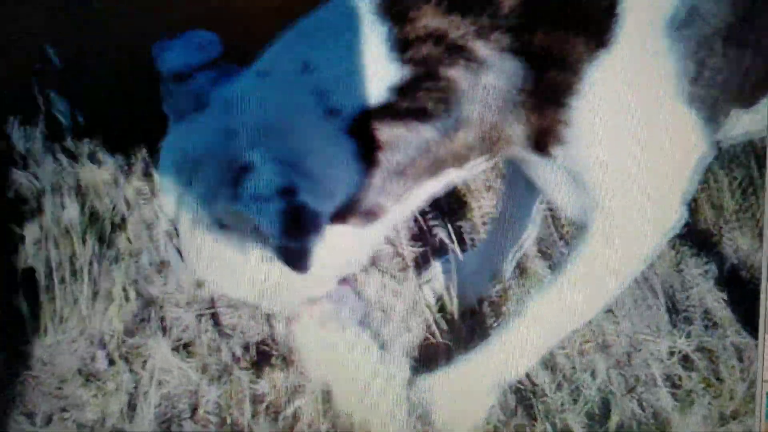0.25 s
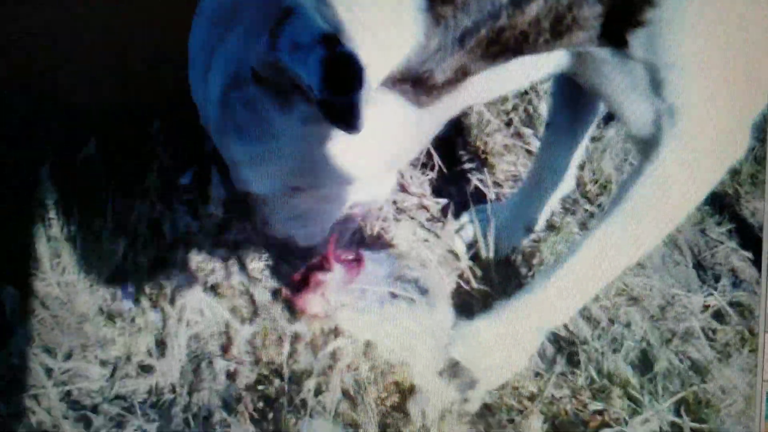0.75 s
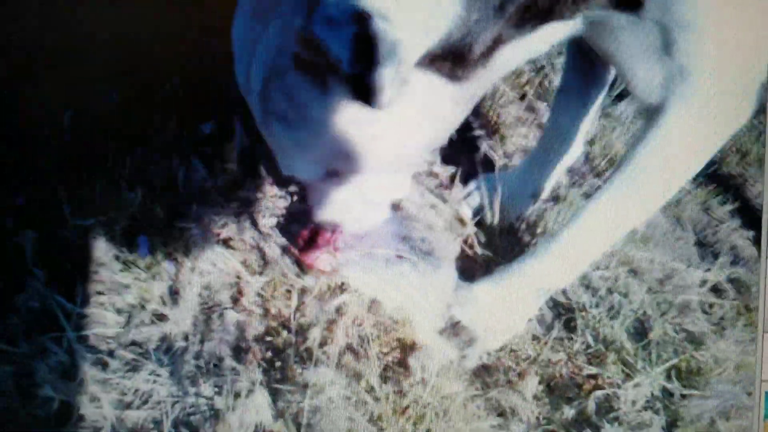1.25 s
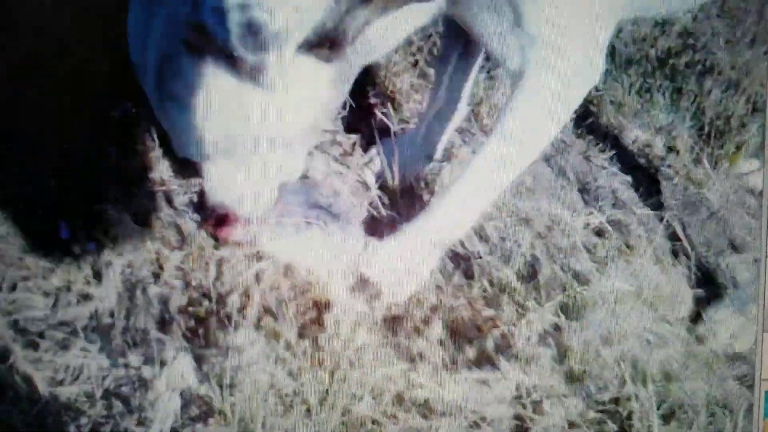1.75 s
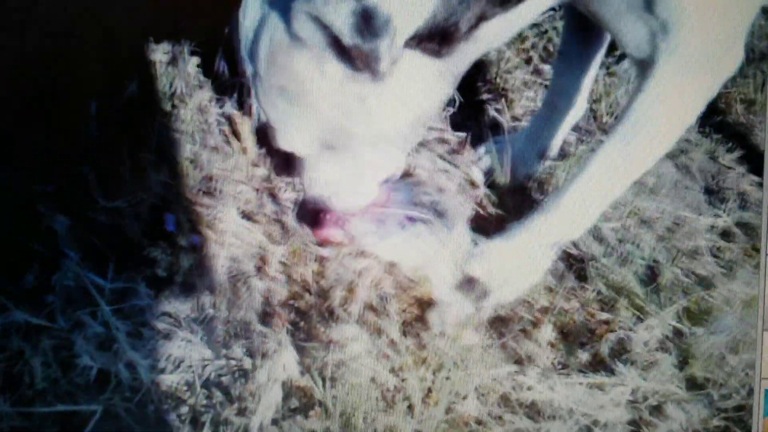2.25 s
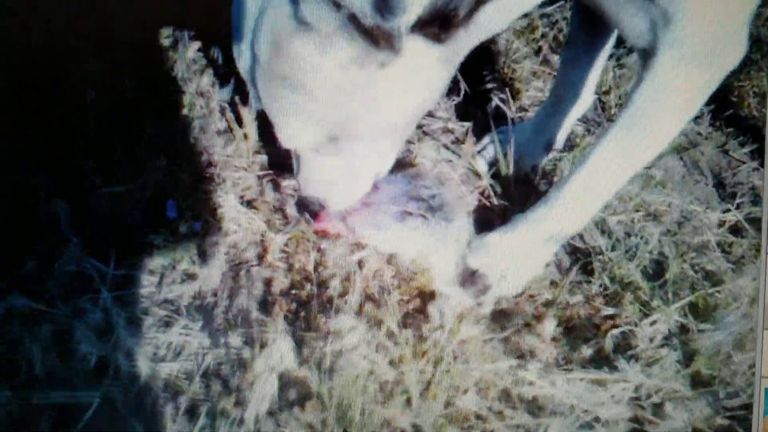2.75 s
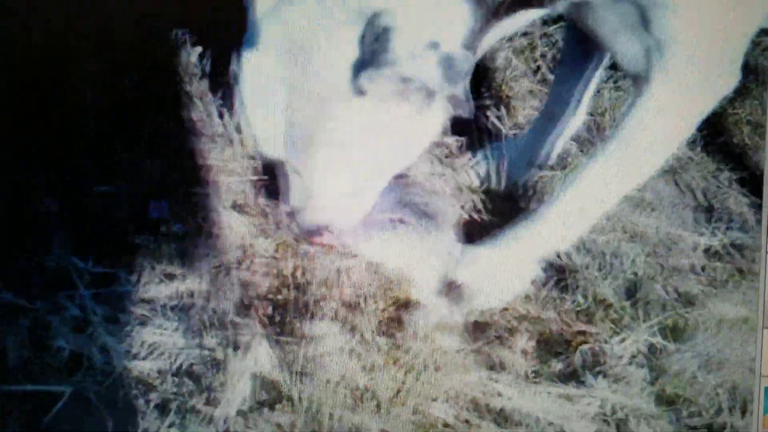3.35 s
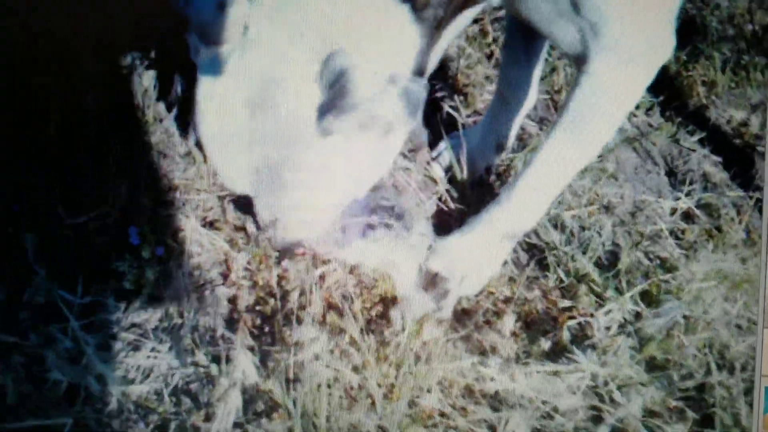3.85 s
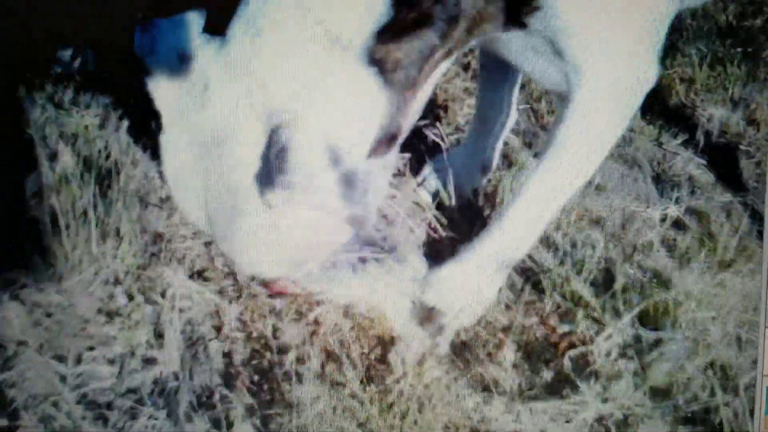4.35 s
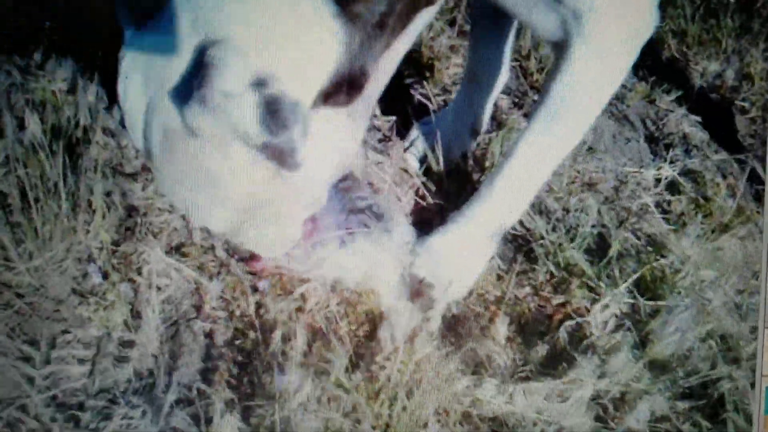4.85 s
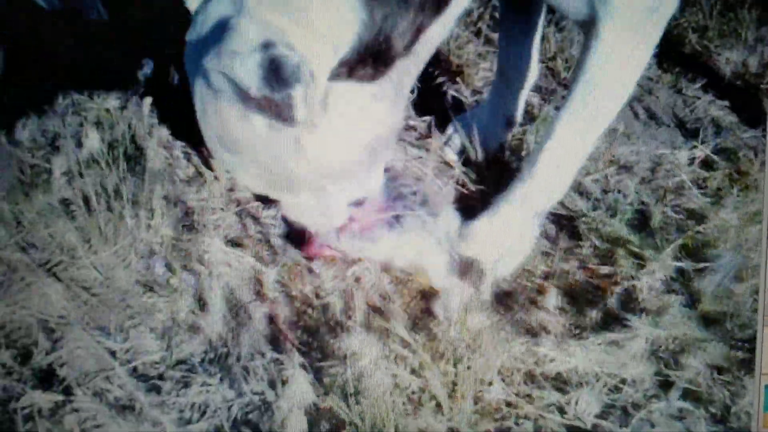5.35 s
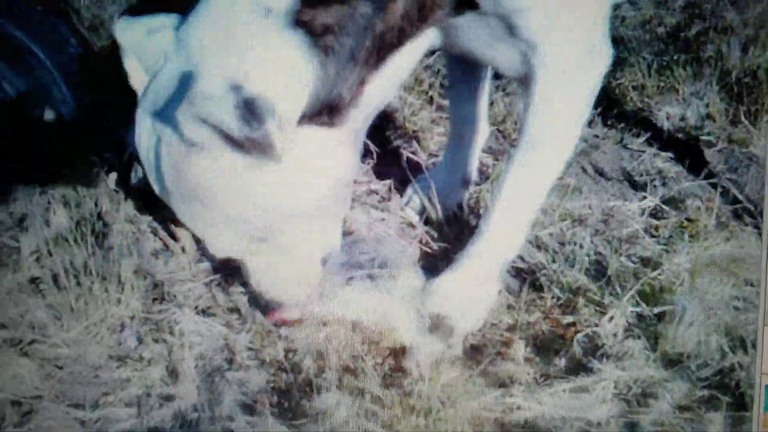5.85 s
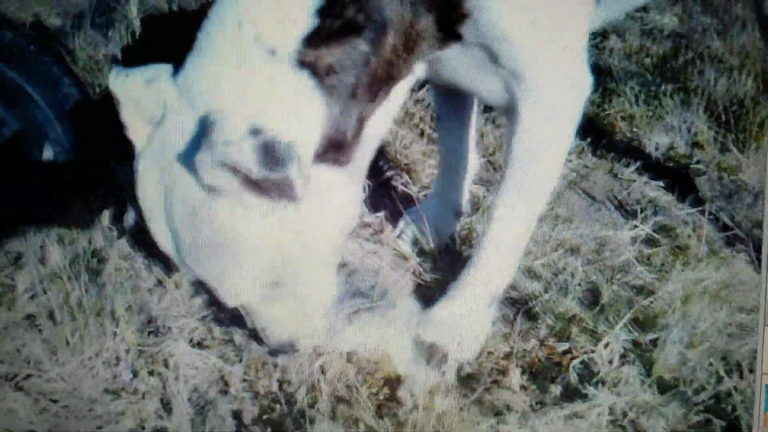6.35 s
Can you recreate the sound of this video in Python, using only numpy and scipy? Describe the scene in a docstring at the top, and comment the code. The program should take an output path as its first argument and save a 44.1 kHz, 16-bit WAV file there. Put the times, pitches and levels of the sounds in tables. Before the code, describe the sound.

Irregular sharp snaps and wet tearing from a feeding dog build to a dense crunching cluster before two seconds, with a rough snort. Then it calms to quiet snuffling, dry stalks rustling, isolated clicks and hollow jaw taps, one stronger knock near the end. A weak far bird twitters. Close stereo pickup of a small speaker, with little bass, a short room tail and faint hiss.

```python
"""Dog chewing at a carcass on dry grass

Filtered grainy noise gives the snuffling, tearing, ripping and rustling; damped tones give the jaw knocks,
ringing tones with noise bursts the snaps of bone and sinew, and gliding tones a far bird.
All of it plays from a small loudspeaker in a quiet room and reaches two microphone ports a hand apart,
where low room rumble and steady hiss lie underneath."""
import sys
import numpy as np
from scipy import signal
from scipy.fft import rfft, irfft, next_fast_len
from scipy.io import wavfile
from scipy.ndimage import uniform_filter1d, map_coordinates

SR = 44100
rng = np.random.default_rng(int(sys.argv[2]) if len(sys.argv) > 2 else 0)


def master(y):
    """Save y as 16-bit WAV."""
    cut = np.clip(np.atleast_2d(y).T, -1, 1)
    pcm = np.round(cut * 32767)  # scale
    wavfile.write(sys.argv[1], SR, pcm.astype(np.int16))


N = 290465


def gain_of(db):
    """Level to amplitude: 20 dB is a factor of ten."""
    return 10 ** (np.asarray(db) / 20)


def evened(x):
    """Normalisation by mean power: scales to rms 1."""
    return x / np.sqrt(np.mean(x ** 2) + 1e-20)


def read(points, hz):
    """Interpolation on a logarithmic frequency axis."""
    f, value = np.transpose(points)
    return np.interp(np.log(hz + 1), np.log(f + 1), value)


def add(mix, s, sound):
    """Superposition: adds a sound to the mix from second s."""
    part = mix[max(round(s * SR), 0):][:len(sound)]
    part += sound[:len(part)]


def coloured(x, spectrum):
    """Linear filtering: weights the spectrum of x by a table of levels, then scales to rms 1."""
    hz = np.fft.rfftfreq(len(x), 1 / SR)
    shaped = rfft(x) * gain_of(read(spectrum, hz))
    return evened(irfft(shaped, len(x)))


def grains(per_s, spread_db, wash):
    """Shot noise: random bursts of uneven size over a share of plain noise."""
    size_db = spread_db * np.minimum(rng.exponential(1, N), 4)
    clicks = gain_of(size_db) * (rng.random(N) < per_s / SR)
    bursts = evened(uniform_filter1d(clicks, size=40))
    return rng.standard_normal(N) * (wash + bursts)


def chewing():
    """Turbulence and fracture noise: nasal air, parting flesh and rubbed grass as coloured grainy noises."""
    # steady working of the muzzle: t/s, wet tearing level/dB, grass rustle level/dB
    steady = [(0, -56.5, -62), (.5, -59.5, -57.5), (.9, -58.5, -57.5), (1.3, -58, -53.5), (1.5, -55.5, -55),
              (1.98, -63, -60.5), (2.35, -59, -59), (2.7, -67, -61), (2.96, -66.5, -62), (3.3, -64.5, -59),
              (3.6, -66, -59), (4.0, -64, -57.5), (4.3, -60.5, -55), (4.8, -64, -55), (5.35, -63.5, -59),
              (5.65, -65.5, -61), (6.0, -65, -62), (6.59, -63, -58.5)]
    # relative spectral density of each noise: f/Hz, level/dB
    nose_spectrum = [(200, -8.5), (350, 1), (600, 7), (900, -2), (1500, -11.5), (4000, -77)]
    flesh_spectrum = [(500, -3.5), (900, -4), (2000, 3.5), (3500, -7.5), (5000, -11), (10000, -5)]
    fibre_spectrum = [(500, -7), (1000, 3), (2000, 1), (3300, -5), (4600, -3.5), (10000, -10.5)]
    grass_spectrum = [(1500, -41), (3500, 2.5), (5500, 0), (9000, 0), (14000, 4.5)]
    nose_under_db = -12.5  # steady snuffle relative to the tearing

    s, *levels_db = np.transpose(steady)
    t = np.arange(N) / SR
    tearing, rustle = (gain_of(np.interp(t, s, db)) for db in levels_db)
    snort, ripping, swish = tugs()
    snuffle = np.hypot(gain_of(nose_under_db) * tearing, snort)  # powers add

    nose = coloured(grains(300, 3.2, wash=1.8), nose_spectrum)
    flesh = coloured(grains(400, 3.4, wash=2.6), flesh_spectrum)
    fibres = coloured(grains(350, 4, wash=1.4), fibre_spectrum)  # coarser: single fibres give way
    stalks = coloured(grains(300, 4, wash=1.6), grass_spectrum)
    grass = coloured(grains(500, 3.6, wash=3.8), grass_spectrum)

    # slow level wander, 1.3 dB rms: one for the flesh, one for the grass
    wander = [evened(uniform_filter1d(v, size=2500)) for v in rng.standard_normal((2, N))]
    uneven_flesh, uneven_grass = gain_of(1.3 * np.array(wander))
    torn = (tearing * flesh + ripping * fibres) * uneven_flesh
    rubbed = (rustle * grass + swish * stalks) * uneven_grass
    return snuffle * nose + torn + rubbed


def tugs():
    """Amplitude envelopes: each tug or snort is a hump that rises a little faster than it falls."""
    # tugs and snorts: t/s, length/s, snuffle level/dB, ripping level/dB, rustle level/dB
    pulls = [(0, 0.055, -55.5, -50.5, -68), (0.57, 0.095, -87, -81, -57.5), (0.973, 0.046, -80, -56, -47),
             (1.548, 0.024, -33, -38, -56), (1.553, 0.094, -42, -46.5, -64),
             (1.617, 0.088, -62, -51.5, -65), (1.69, 0.088, -43, -44.5, -51), (1.723, 0.055, -42, -46, -52),
             (1.752, 0.12, -47, -51.5, -73), (2.002, 0.25, -64, -61.5, -52.5), (2.173, 0.22, -61, -64, -64),
             (2.433, 0.19, -91, -59.5, -56.5), (2.557, 0.24, -83, -63.5, -53.5),
             (3.021, 0.17, -46.5, -51, -61), (3.637, 0.35, -87, -58, -57.5), (4.116, 0.2, -65.5, -63, -74),
             (4.344, 0.3, -59.5, -49.5, -49), (4.664, 0.067, -88, -56, -51), (4.847, 0.25, -68.5, -63, -81),
             (5.654, 0.15, -66, -86, -65.5), (5.737, 0.24, -74, -64.5, -57), (6.202, 0.1, -61, -86, -79)]
    peak_at, sharpness = 0.35, 1.2  # share of the length spent rising; exponent of the sine hump
    out = np.zeros((3, N))
    for s, length, *levels_db in pulls:
        u = np.linspace(0, 1, round(length * SR))
        hump = np.sin(np.pi * np.interp(u, [0, peak_at, 1], [0, .5, 1])) ** sharpness
        for row, db in zip(out, levels_db):
            add(row, s, gain_of(db) * hump)
    return out


def snaps():
    """Impulsive fracture: a short damped ring roughened by noise, with a wide bright crack."""
    # snaps of bone, sinew and spit: t/s, ring level/dB, ring f/Hz, crack level/dB relative to the ring
    breaks = [(0.202, -39, 1090, -27), (0.292, -40, 1620, -6), (0.3334, -27, 1970, -9.5),
              (0.423, -42, 1570, -16), (0.4669, -45, 1270, -4), (0.564, -42, 1750, -22),
              (0.5802, -39, 1730, 0), (0.604, -33.5, 2130, -3.5), (0.6994, -45.5, 1610, 3),
              (0.7546, -42.5, 1710, 1), (0.767, -45, 1720, 5), (0.812, -40.5, 1320, -26),
              (0.836, -37.5, 960, -22), (0.9552, -31.5, 1980, -6), (1.0018, -46.5, 1140, 15.5),
              (1.0911, -46.5, 1840, 10), (1.2007, -26.5, 1670, -37), (1.212, -42, 1500, 7),
              (1.3841, -39, 1700, -6), (1.4422, -40, 2180, 3), (1.479, -40.5, 2000, -23),
              (1.507, -28, 1770, -12), (1.5225, -53, 2010, 9), (1.5313, -19, 1195, -5.5),
              (1.5348, -17.5, 970, 0.5), (1.542, -25, 2530, 11.5), (1.5553, -19, 1495, 5),
              (1.5926, -26.5, 2280, -3), (1.5974, -28.5, 2600, -5), (1.629, -25, 935, -23),
              (1.6546, -38.5, 2950, -35), (1.66, -39, 3380, -14), (1.664, -34.5, 1900, -22),
              (1.688, -40, 6300, 11), (1.7012, -35.5, 1670, -8), (1.709, -46, 2540, 12),
              (1.7154, -29, 1780, -12), (1.719, -33, 1700, -10), (1.727, -33.5, 1700, 7.5),
              (1.74, -35, 1510, -1), (1.7522, -18, 2430, -1.5), (1.7562, -21, 1900, -5.5),
              (1.7599, -20, 487, -30), (1.786, -35, 2550, -6), (1.8457, -39.5, 1690, -9),
              (1.934, -48.5, 1480, -25), (2.198, -46, 1560, -18), (2.748, -46, 2860, -11),
              (2.766, -37, 2900, -37), (4.917, -44.5, 1070, -17), (5.149, -27, 1600, -32),
              (5.6562, -35, 910, -27), (5.861, -42, 1110, 3.5), (6.2431, -43.5, 3130, -15),
              (6.246, -34.5, 5850, -1), (6.317, -45, 2930, -4)]
    # relative spectral density of the crack: f/Hz, level/dB
    crack_spectrum = [(1500, -13.5), (4000, -13), (8000, -8.5), (14000, -16)]
    crack_rise_s, crack_t60_s = .0005, .009
    out, t = np.zeros(N), np.arange(SR // 20) / SR
    onset = np.sin(np.pi / 2 * np.minimum(t / .0007, 1)) ** 2
    noises = rng.standard_normal((len(breaks), 2, len(t)))
    for (s, db, hz, crack_db), (ring_noise, crack_noise) in zip(breaks, noises):
        resonance = [(hz / 3, -22), (hz, 0), (hz * 1.24, -7), (hz * 4, -34), (SR / 2, -60)]
        rough = coloured(ring_noise, resonance)
        ring_t60_s = .009 + 5.5 / hz  # higher rings die sooner
        ring = (np.sin(2 * np.pi * hz * t) + 0.52 * rough) * gain_of(-60 * t / ring_t60_s)
        crack = gain_of(crack_db - 60 * t / crack_t60_s) * coloured(crack_noise, crack_spectrum)
        crack *= np.minimum(t / crack_rise_s, 1)
        add(out, s - .0005, gain_of(db) * onset * (ring + crack))
    return out


def knocks():
    """Damped modes: a dull blow in the jaw sounds two close tones that die away together."""
    # jaw and bone knocks: t/s, level/dB, f/Hz of the lower tone at the onset
    blows = [(0.003, -40.5, 371), (0.083, -46.5, 351), (0.201, -47, 350), (0.293, -40, 346),
             (0.35, -44.5, 353), (0.423, -43, 368), (0.585, -46, 356), (0.7, -46.5, 343),
             (0.838, -39.5, 383), (0.864, -44.5, 363), (0.998, -48.5, 345), (1.201, -41, 363),
             (1.385, -39.5, 340), (1.534, -30.5, 376), (1.556, -22.5, 357), (1.594, -28.5, 500),
             (1.603, -37, 406), (1.631, -31, 393), (1.675, -38, 375), (1.712, -35.5, 390),
             (1.903, -42.5, 418), (2.2, -46, 517), (2.273, -40, 451), (2.662, -42, 462),
             (3.785, -48.5, 590), (4.2, -46, 580), (4.536, -41.5, 550), (4.919, -43, 377),
             (5.422, -44, 534), (5.659, -29.5, 403), (5.703, -39.5, 336), (5.722, -41, 343),
             (6.016, -54, 310), (6.204, -36.5, 496)]
    sag_per_s = 1.33  # phase bend of the lower tone: its pitch sinks by twice this share per second
    out, t = np.zeros(N), np.arange(SR // 5) / SR
    rise = 1 - np.exp(-t / 0.00014)
    for (s, db, hz), (a, b) in zip(blows, rng.random((len(blows), 2))):
        lower = np.sin(2 * np.pi * hz * (t - sag_per_s * t ** 2))
        upper = np.sin(2 * np.pi * (hz * (1.194 + 0.2 * a) * t + b))
        decay = gain_of(db - 60 * t * hz / 24)  # falls 60 dB in 24 cycles
        add(out, s - .002, decay * rise * (lower + 0.4 * upper))
    return out


def bird():
    """Frequency modulation: thin gliding whistles, broken up by moving air and smeared by echoes."""
    # bird notes, each one glide: t/s, length/s, start f/Hz, end f/Hz, level/dB before the overall trim
    notes = [(.882, .04, 4600, 5200, -57), (1.24, .027, 4350, 4800, -52), (1.258, .011, 4250, 3600, -50),
             (1.267, .009, 3600, 4300, -53), (1.278, .011, 4300, 2950, -51), (1.288, .017, 2900, 3400, -57),
             (1.3, .022, 3350, 3350, -53), (2.23, .026, 3700, 3100, -65), (2.256, .03, 3150, 3450, -65),
             (2.55, .038, 3300, 3750, -63), (2.588, .04, 3700, 3150, -63), (3.25, .035, 3150, 3200, -64),
             (3.325, .04, 3200, 3550, -68), (3.608, .04, 3050, 4000, -69), (4.14, .025, 4050, 4650, -63),
             (4.16, .018, 4100, 3750, -63), (4.176, .014, 4600, 4300, -60), (4.19, .026, 3050, 3350, -66),
             (4.228, .024, 3600, 4150, -65), (4.268, .016, 3050, 3500, -65), (5.357, .024, 3800, 3900, -66),
             (5.4, .035, 3200, 4600, -64), (5.43, .028, 3700, 4100, -62), (5.46, .032, 3000, 3600, -65),
             (5.485, .025, 3100, 3750, -66), (5.503, .03, 3800, 4600, -62), (5.53, .028, 2900, 3500, -68),
             (5.554, .03, 3400, 2950, -67), (5.62, .04, 4100, 3700, -66), (5.66, .045, 3350, 3050, -68),
             (5.702, .033, 2650, 2300, -64), (6.268, .024, 4650, 4600, -64), (6.29, .016, 4600, 3700, -59),
             (6.325, .02, 2950, 3650, -68), (6.35, .022, 3600, 2950, -69)]
    trim_db, echo_gain, echo_t60_s = -3.5, .9, .13
    whistles = np.zeros(N)
    tremble_hz = uniform_filter1d(1500 * rng.standard_normal(N), size=120)  # varies below about 200 Hz
    for s, length, from_hz, to_hz, db in notes:
        count = round(length * SR)
        pitch = np.linspace(from_hz, to_hz, count) + tremble_hz[round(s * SR):][:count]
        tone = np.sin(2 * np.pi * np.cumsum(pitch) / SR)
        add(whistles, s, np.sqrt(2) * gain_of(db) * signal.windows.tukey(count, .4) * tone)
    flutter = uniform_filter1d(rng.standard_normal(N), size=90)
    flutter = evened(uniform_filter1d(flutter, size=90))
    direct = gain_of(trim_db) * whistles * gain_of(4 * flutter)  # flutter of 4 dB rms
    t = np.arange(SR // 4) / SR
    echoes = rng.standard_normal(len(t)) * gain_of(-60 * t / echo_t60_s)
    echoes /= np.linalg.norm(echoes)
    return direct + echo_gain * signal.oaconvolve(direct, echoes)[:N]


def path(modes, hz):
    """Minimum-phase response of loudspeaker and port: band edges, peaks and dips, made causal."""
    low_hz, top_hz = 271.5, 14300  # each edge lies 10 Hz lower, since 10 Hz is added to the axis
    db = sum(g / (1 + (2 * (hz - f) / w) ** 2) for f, w, g in modes)
    db = db - 10 * np.log10(1 + (low_hz / (hz + 10)) ** 17.0)
    db = db - 24 / (1 + (top_hz / (hz + 10)) ** 150)  # a 24 dB step down
    # folding the cepstrum onto positive times gives the phase that belongs to the level
    folded = irfft(np.log(gain_of(db)))
    folded[1:len(hz) - 1] *= 2
    folded[len(hz):] = 0
    return np.exp(rfft(folded))


def room(x):
    """Reverberation: sparse taps of random sign, separate for each port, each band with its own decay."""
    # reverberation time: f/Hz, t60/s
    decay_times = [(300, .22), (1000, 0.14), (4000, 0.063), (12000, 0.22)]
    taps = np.zeros((2, SR // 2))
    slots = np.arange(120, SR // 2 - 20, 20)
    at = slots + rng.integers(0, 20, (2, len(slots)))  # one tap in every 20 samples
    np.put_along_axis(taps, at, rng.choice([-1., 1.], at.shape), 1)
    hz, t, z = signal.stft(taps, SR, nperseg=256)
    decay = gain_of(-60 * t / read(decay_times, hz)[:, None])
    tail = signal.istft(z * decay, SR, nperseg=256)[1]
    return signal.fftconvolve(x[None], tail / np.linalg.norm(tail[0]), axes=1)[:, :N]


def rumble():
    """Partial coherence: low room noise with a shared part and a weaker separate part at each port."""
    # relative spectral density of the rumble: f/Hz, level/dB
    spectrum = [(20, -17.5), (54, -9.5), (72, -2.5), (95, -11), (125, -4.5), (170, -12.5), (240, -17),
                (320, -11), (660, -100)]
    start_db, fade_db_per_s = -74.5, -.5  # level at the start, before the mixing weights below
    shared, left, right = (coloured(v, spectrum) for v in rng.standard_normal((3, N)))
    level = gain_of(start_db + fade_db_per_s * np.arange(N) / SR)
    return level * (shared + 0.58 * np.array([left, right])) / 0.75


def scene():
    """Propagation as linear filtering: direct sound and room tail through two paths, over rumble and hiss."""
    # peaks and dips from loudspeaker to each port: f/Hz, width/Hz, level/dB
    left_modes = [(274, 70, -6), (542, 704, 9), (760, 397, -11), (1173, 276, 16.5), (1743, 780, -8),
                  (1717, 354, 7.5), (2615, 470, 11.5), (2890, 110, 4.5), (3720, 400, -10), (4130, 110, 6.5),
                  (4870, 40, -12), (6200, 2100, 9.5), (6990, 1340, -8), (8850, 520, 9.5), (9750, 480, 16),
                  (10000, 2190, -13.5), (13220, 920, 12)]
    right_modes = [(302, 95, -2.5), (869, 104, 14), (895, 525, -21), (1350, 937, 19.5), (1388, 214, -7.5),
                   (1727, 180, -5.5), (2010, 515, 4.5), (2660, 780, -3.5), (3120, 1130, 11.5),
                   (4090, 61, 3.5), (4610, 780, 6), (4916, 335, -19.5), (7500, 560, 3), (9630, 1040, -13),
                   (10000, 210, 1), (13300, 820, -4.5), (13900, 2100, -4)]
    # phase turn of the right port against the left, by reflections: f/Hz, phase/rad
    phase_turn = [(332, 1.01), (631, -.14), (1034, 4.11), (1732, 4.9), (3141, 11.23), (4354, 20.86),
                  (5513, 18.13), (5776, 20.99), (6520, 14.52), (7668, 28.01), (9100, 24.26), (11963, 44.47),
                  (13369, 43.64)]
    # room tail relative to the direct sound: f/Hz, level/dB
    tail_level = [(300, -3), (1000, -10.5), (2500, -8), (6000, -5.5), (12000, -10.5)]
    port_lag_s, sway_s = 16 / 44100, 2.4e-5  # lag of the right direct sound; rms drift of the lag

    played = chewing() + snaps() + knocks() + bird()
    size = next_fast_len(N + SR // 2) * 2
    hz = np.fft.rfftfreq(size, 1 / SR)
    direct = rfft(played, size)
    tail = gain_of(read(tail_level, hz)) * rfft(room(played), size)
    turn = np.exp(1j * (read(phase_turn, hz) - 2 * np.pi * hz * port_lag_s))
    left_spectrum = path(left_modes, hz) * (direct + tail[0])
    right_spectrum = path(right_modes, hz) * (direct * turn + tail[1])
    left, right = irfft(np.array([left_spectrum, right_spectrum]), size)[:, :N]

    # the hand sways, so the lag between the ports drifts a little
    t = np.arange(N) / SR
    swings = (np.sin(2 * np.pi * (f * t + rng.random())) / np.sqrt(f) for f in np.geomspace(.3, 4, 12))
    sway = evened(sum(swings))
    right = map_coordinates(right, [(t + sway_s * sway) * SR], order=5, mode="nearest")
    hiss = gain_of(-80.0) * rng.standard_normal((2, N))  # of the microphones
    return np.array([left, right]) + rumble() + hiss


def record(dry):
    """Band limitation: a symmetric low-pass filter removes the top of the spectrum."""
    edge_hz = 15278
    lowpass = signal.firwin(511, edge_hz, window=("kaiser", 9), fs=SR)
    return signal.oaconvolve(dry, lowpass[None], "same")


dry = scene()
out = record(dry)
master(out)
```